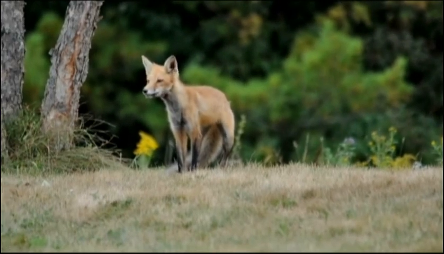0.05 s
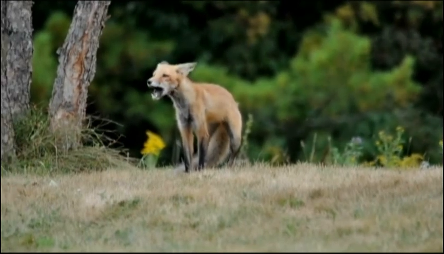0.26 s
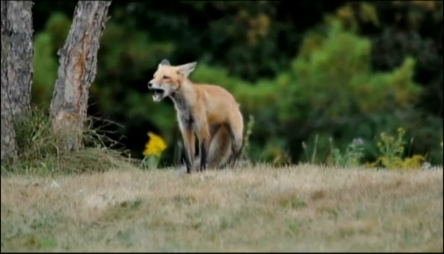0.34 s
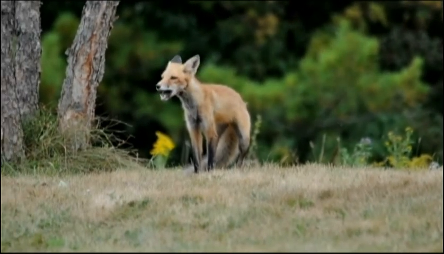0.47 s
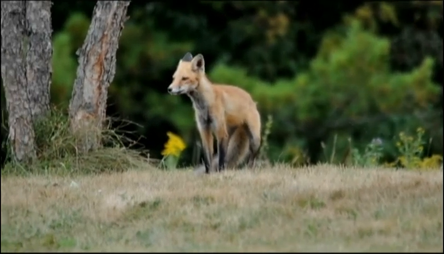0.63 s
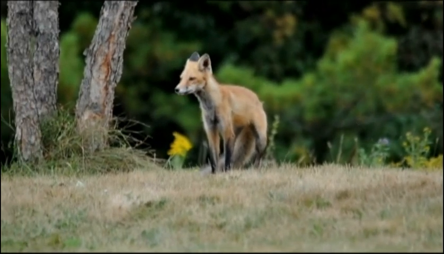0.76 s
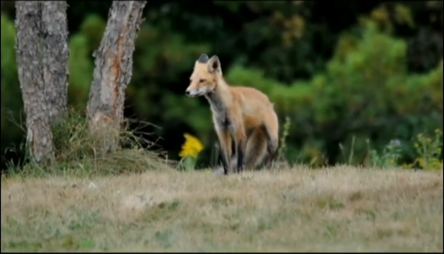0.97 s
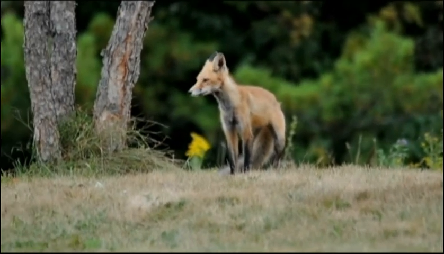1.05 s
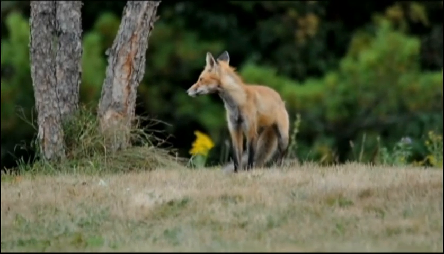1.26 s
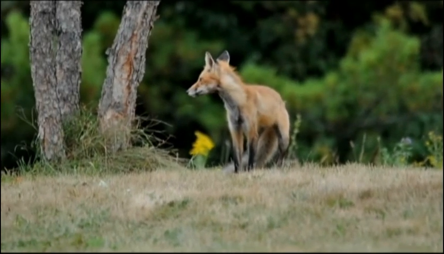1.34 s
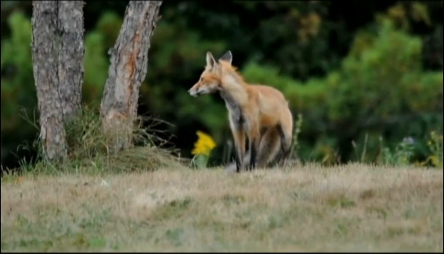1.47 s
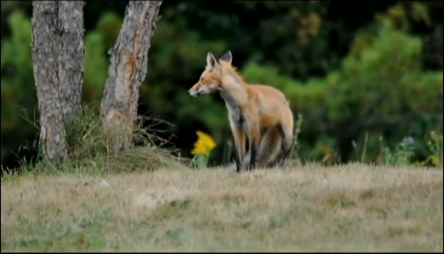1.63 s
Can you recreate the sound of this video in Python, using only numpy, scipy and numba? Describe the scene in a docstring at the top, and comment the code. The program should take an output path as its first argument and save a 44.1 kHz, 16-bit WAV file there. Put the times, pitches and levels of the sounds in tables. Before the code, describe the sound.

A fox barks once, close and harsh, the rasp turning into a short, clearer yelp. The sound echoes softly through the trees and fades into quiet outdoor air with a few faint dry ticks.

```python
"""A red fox gives one harsh alarm bark on a lawn at the edge of a wood.
Its vocal folds flap unevenly, rising and falling in rate, and ring the throat; the rasp settles
into a short, clearer yelp as the jaw partly closes. A nearby surface slaps the bark back and the
trees add a long wash and a soft echo. Behind it are quiet outdoor air, a few dry ticks and one
faint far-off call."""
import sys
import numpy as np
from scipy import signal
from scipy.fft import rfft, irfft
from scipy.io import wavfile
from scipy.ndimage import uniform_filter1d, map_coordinates
from numba import njit

SR = 44100
rng = np.random.default_rng(int(sys.argv[2]) if len(sys.argv) > 2 else 0)


def master(y):
    """Save y as 16-bit WAV."""
    cut = np.clip(np.atleast_2d(y).T, -1, 1)
    pcm = np.round(cut * 32767)  # scale
    wavfile.write(sys.argv[1], SR, pcm.astype(np.int16))


N = 74970

# colour of the air bed: frequency_hz, relative_db
AIR_SPECTRUM = [(25, -2.5), (80, 1.5), (160, -2), (400, -2.5), (650, -6.5), (1300, -3.5), (2000, -8),
                (3000, -10), (4000, -15), (5000, -24), (6500, -31.5), (8200, -50.5), (15000, -39)]
# cues for the dry ticks: start_s, peak_db
TICK_CUES = [(0.061, -50), (0.185, -47.5), (0.819, -42.5), (0.9397, -51), (0.9474, -47), (1.1345, -41),
             (1.1379, -52.5), (1.142, -60), (1.4297, -49), (1.4772, -50), (1.612, -46.5)]
# woody body of a tick: centre_hz, width_hz, relative_db
TICK_RESONANCES = [(2310, 1500, 7), (3850, 1500, 3)]
# contour of the far call: time_s, pitch_hz, level_db
FAR_CALL_CONTOUR = [(1.44, 1000, -90), (1.505, 1005, -70.5), (1.57, 940, -66.5), (1.63, 929, -68),
                    (1.69, 894, -77)]
# reverb bands of the wood: centre_hz, relative_density_db, t60_s
WOOD_BANDS = [(600, -25, 0.92), (1161, -14, 1.74), (1910, -14, 1.84), (3240, -15, 0.64), (5500, -8, 0.49)]
# the fox's effort: time_s, jaw_opening (0-1), flap_rate_hz
JAW_AND_FOLDS = [(0.21, 0.2, 400.6), (0.275, 0.53, 523.7), (0.345, 0.99, 517.3), (0.395, 1, 462.2),
                 (0.45, 0.59, 386.1), (0.5, 0.63, 375.7), (0.57, 0.6, 367.4)]
# throat resonances by jaw position: shut_hz, open_hz, width_hz, shut_relative_db, open_relative_db
THROAT_FORMANTS = [(915, 1107, 473, -0.5, -3.5), (1168, 1414, 322, -4, 5), (1788, 1898, 383, 4.5, 5.5),
                   (2230, 2630, 750, -16.5, -4.5), (3075, 3467, 500, -4, -0.5),
                   (3900, 3930, 830, -17.5, -7.5), (4180, 4950, 920, -21.5, -15),
                   (6400, 6150, 1530, -38, -22.5)]
# harmonics of the clear yelp, fundamental first: relative_db
YELP_PARTIALS = [-4.5, -19, -25, -23.5, -37.5, -39]
# shape of the bark: time_s, rasp_db, yelp_db, yelp_pitch_hz, roughness (0-1)
BARK_CONTOUR = [(0.207, -65.5, -68.5, 820, 0.8), (0.234, -42, -46.5, 869.2, 1),
                (0.272, -31.5, -46, 1055, 0.97), (0.345, -29.5, -34, 1076, .35),
                (0.385, -32.5, -43.5, 1099, .7), (0.44, -36, -48, 1155, .55),
                (0.49, -37.5, -37.5, 1148, .3), (0.526, -46.5, -52, 1138, .45),
                (0.545, -45, -40.5, 1128, .25), (0.564, -54, -37.5, 1107, 0.4),
                (0.576, -66.5, -47, 1092, 0.7), (0.62, -74, -61.5, 990.4, .8)]
# harmonics of the far call, fundamental first: relative_db
FAR_PARTIALS = [-14, 0.5, -1, -14]
# bands delayed to smear the pulses: centre_hz
SMEAR_BANDS = [1507, 2285, 3290, 4370]

AIR_DB, AIR_SWELL_DB = -61.5, 1.5
TICK_DECAY_S, TICK_CRUMBLE_DB, TICK_TOP_HZ = 0.0012, -10, 4500
FAR_WAVER, FAR_SEND_DB = .04, 7.5
WOOD_BUILD_S, NEAR_DB, NEAR_DECAY_S = 0.042, -11, 0.02
ECHO_S, ECHO_SPREAD_S, ECHO_DENSITY_DB, ECHO_HZ = 0.406, 0.045, -27, 1570
SLAP_S, SLAP_DB = .0357, -11
FLAP_JITTER, FLAP_SCATTER_DB, PUFF_DB, PUFF_DECAY_CYCLES = .08, 2.4, -1.5, 0.46
RATTLE_HZ, RATTLE_DB = 168.4, 0.65
THROAT_LOW_CUT_HZ, THROAT_LEAK_DB = 704, -47
YELP_JITTER, YELP_JITTER_HZ, YELP_SHIMMER_DB = .036, 600, 4
NOTCH_HZ, NOTCH_WIDTH_HZ, DULL_HZ, TOP_HZ = 5517, 810, 6920, 13000


def amp(db):
    """Decibels to gain."""
    return 10 ** (np.asarray(db) / 20)


def unit(x):
    """Scale to rms 1."""
    return x / np.sqrt(np.mean(x ** 2))


def curves(table):
    """One automation curve per column, ramping between the times in the first."""
    times, *columns = np.array(table, float).T
    return [np.interp(np.arange(N) / SR, times, column) for column in columns]


def gate(table):
    """Open from the first to the last time of a table, with soft edges."""
    t = np.arange(N) / SR
    return uniform_filter1d(1. * ((t > table[0][0]) & (t < table[-1][0])), size=300)


def wander(hz):
    """Smooth random modulation of rms 1."""
    steps = np.arange(N) / SR * hz
    return unit(map_coordinates(rng.standard_normal(4096), [steps], order=3, mode="wrap"))


@njit
def svf(x, hz, width):
    """State-variable band-pass whose centre may sweep; gain 1 at the centre."""
    y, band_state, low_state = np.empty(len(x)), 0., 0.
    for i in range(len(x)):
        g, damping = np.tan(np.pi * hz[i] / SR), width / hz[i]
        v = (band_state + g * (x[i] + 1e-18 - low_state)) / (1 + g * (g + damping))
        band_state, low_state = 2 * v - band_state, low_state + 2 * g * v
        y[i] = damping * v
    return y


def resonate(x, hz, width_hz):
    """One resonance, steady or swept."""
    return svf(x, hz * np.ones(N), float(width_hz))


def band(x, hz, width_hz):
    """A resonance applied twice, for steep skirts."""
    return resonate(resonate(x, hz, width_hz), hz, width_hz)


def cut(x, hz, kind, order):
    """Butterworth high- or low-pass."""
    return signal.sosfilt(signal.butter(order, hz, kind, fs=SR, output="sos"), x)


def partials(hz, levels_db):
    """Harmonics on a moving pitch, at rms 1."""
    phase = 2 * np.pi * np.cumsum(hz) / SR
    return unit(sum(amp(db) * np.sin((k + 1) * phase) for k, db in enumerate(levels_db)))


def outdoor_air():
    """A soft, slowly swelling bed of distant leaves and rumble."""
    hz, db = np.array(AIR_SPECTRUM).T
    colour = amp(np.interp(np.log(np.fft.rfftfreq(N, 1 / SR) + 1), np.log(hz), db))
    bed = unit(irfft(rfft(rng.standard_normal(N)) * colour, N))
    return bed * amp(AIR_DB + AIR_SWELL_DB * wander(hz=1.95))


def ticks():
    """Tiny dry snaps up close: a click and a short crumble ring two woody resonances."""
    t, out = np.arange(N) / SR, np.zeros(N)
    for start, peak_db in TICK_CUES:
        decay = (t >= start) * np.exp(-np.abs(t - start) / TICK_DECAY_S)
        push = amp(TICK_CRUMBLE_DB) * rng.standard_normal(N) * decay
        push[int(start * SR)] += 1  # the click
        snap = sum(amp(db) * resonate(push, hz, width) for hz, width, db in TICK_RESONANCES)
        snap = cut(snap, TICK_TOP_HZ, "low", order=5)
        out += amp(peak_db) * snap / np.abs(snap).max()
    return out


def far_call():
    """A faint falling cry from deep in the trees, probably a bird."""
    hz, db = curves(FAR_CALL_CONTOUR)
    cry = partials(hz * (1 + FAR_WAVER * wander(hz=293.7)), FAR_PARTIALS)
    return cry * amp(db) * gate(FAR_CALL_CONTOUR)


def wood_reverb(x):
    """Quick scatter off ground and near trunks, a long wash from the wood, a soft tree-line echo."""
    t = np.arange(N) / SR
    unit_energy = lambda h: unit(h) / np.sqrt(N)
    scatter = band(rng.standard_normal(N), hz=1900, width_hz=7700) * np.exp(-t / NEAR_DECAY_S)
    response = amp(NEAR_DB) * unit_energy(scatter)
    bloom = 1 - np.exp(-t / WOOD_BUILD_S)
    for hz, db, t60 in WOOD_BANDS:
        wash = band(rng.standard_normal(N), hz, hz / 2) * amp(-60 * t / t60) * bloom
        response += amp(db) * unit_energy(wash) * np.sqrt(hz / SR)
    echo_swell = np.exp(-.5 * ((t - ECHO_S) / ECHO_SPREAD_S) ** 2)
    echo = band(rng.standard_normal(N), ECHO_HZ, ECHO_HZ) * echo_swell
    response += amp(ECHO_DENSITY_DB) * unit_energy(echo) * np.sqrt(2 * ECHO_HZ / SR)
    return signal.fftconvolve(x, response)[:N]


def slapback(x):
    """One distinct early reflection off a nearby hard surface."""
    return amp(SLAP_DB) * np.interp(np.arange(N) - SLAP_S * SR, np.arange(N), x, left=0)


def smear(buzz):
    """Each flap is smeared, as by ground and grass, so the rasp sounds less pulsed."""
    for hz in SMEAR_BANDS:
        buzz = buzz - 2 * resonate(buzz, hz, width_hz=413)  # all-pass
    return buzz


def vocal_folds(flap_hz, roughness):
    """Uneven flaps of the folds, each trailing a puff of turbulent air."""
    uneven_hz = flap_hz * np.exp(FLAP_JITTER * roughness * wander(flap_hz.mean()))
    cycles = np.cumsum(uneven_hz) / SR
    flaps = np.diff(np.floor(cycles), prepend=0) * amp(FLAP_SCATTER_DB * rng.standard_normal(N))
    puffs = np.exp(-(cycles % 1) / PUFF_DECAY_CYCLES) * rng.standard_normal(N)
    buzz = unit(flaps) + amp(PUFF_DB) * np.sqrt(roughness) * unit(puffs)
    return buzz * amp(RATTLE_DB * wander(RATTLE_HZ))


def throat(buzz, jaw):
    """The buzz rings formants that the jaw retunes."""
    voice = amp(THROAT_LEAK_DB) * buzz
    for k, (shut_hz, open_hz, width, shut_db, open_db) in enumerate(THROAT_FORMANTS):
        ring = band(buzz, shut_hz + (open_hz - shut_hz) * jaw, width)
        voice += (-1) ** k * amp(shut_db + (open_db - shut_db) * jaw) * ring
    voice = cut(voice, THROAT_LOW_CUT_HZ, "high", order=6)
    return voice / np.sqrt(uniform_filter1d(voice ** 2, size=1000))  # ride the level to rms 1


def fox_bark():
    """A throaty rasp, with a clear yelp showing through wherever the folds vibrate evenly."""
    rasp_db, yelp_db, pitch_hz, roughness = curves(BARK_CONTOUR)
    jaw, flap_hz = curves(JAW_AND_FOLDS)
    yelp = partials(pitch_hz * (1 + YELP_JITTER * roughness * wander(YELP_JITTER_HZ)), YELP_PARTIALS)
    yelp *= amp(yelp_db + YELP_SHIMMER_DB * roughness * wander(RATTLE_HZ))
    rasp = amp(rasp_db) * throat(smear(vocal_folds(flap_hz, roughness)), jaw)
    return (rasp + yelp) * gate(BARK_CONTOUR)


def scene():
    """The fox up front with its echoes; behind it the far call, sent harder to the reverb, ticks, air."""
    bark, far = fox_bark(), far_call()
    reverb = wood_reverb(bark + amp(FAR_SEND_DB) * far)
    return (bark + slapback(bark) + far + reverb + ticks() + outdoor_air())[None]


def record(dry):
    """Master EQ: a deep narrow notch in the treble, a dull top and a steep final low-pass."""
    x = dry[0]
    for _ in range(2):
        x = x - resonate(x, NOTCH_HZ, NOTCH_WIDTH_HZ)
    x = cut(x, DULL_HZ, "low", order=3)
    return signal.sosfilt(signal.ellip(8, .2, 70, TOP_HZ, fs=SR, output="sos"), x)[None]


dry = scene()
out = record(dry)
master(out)
```